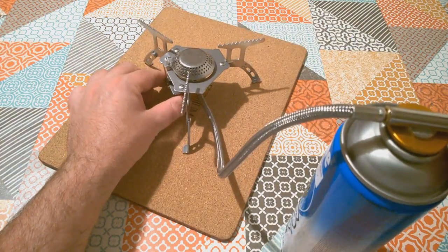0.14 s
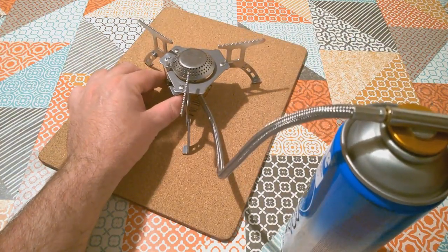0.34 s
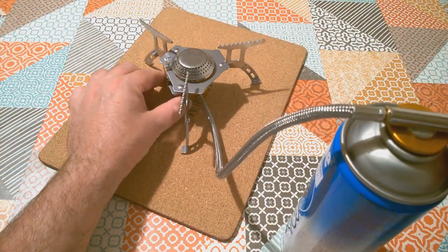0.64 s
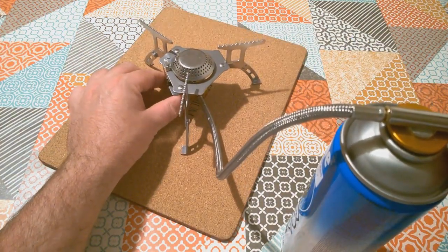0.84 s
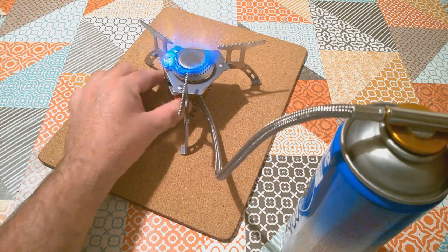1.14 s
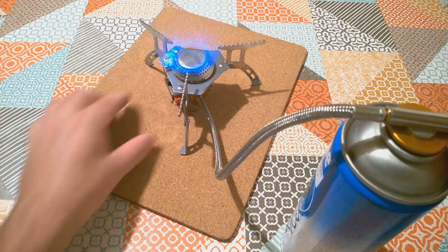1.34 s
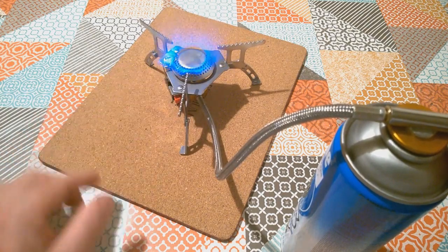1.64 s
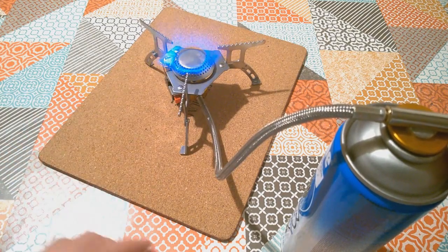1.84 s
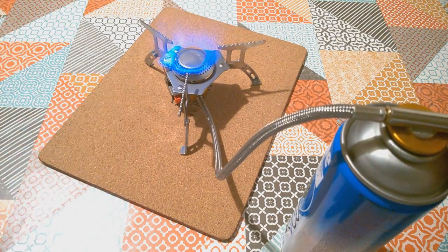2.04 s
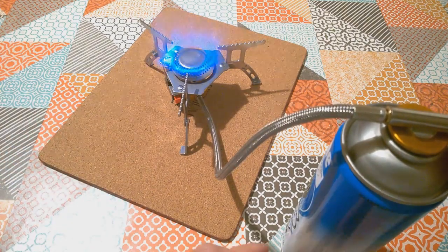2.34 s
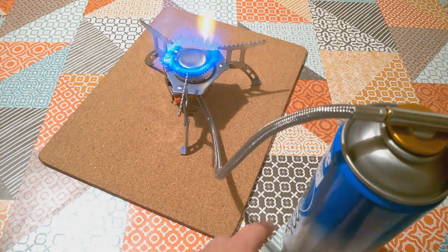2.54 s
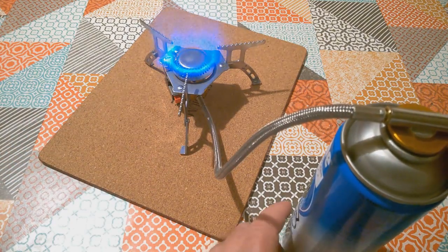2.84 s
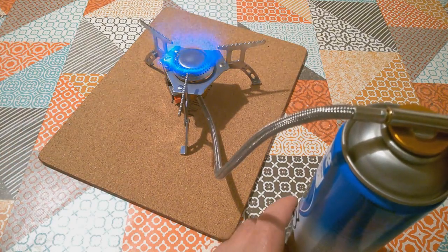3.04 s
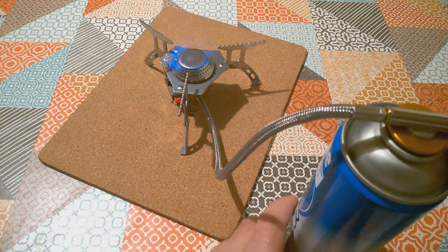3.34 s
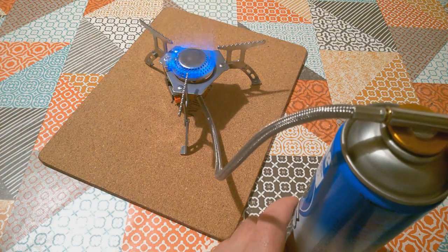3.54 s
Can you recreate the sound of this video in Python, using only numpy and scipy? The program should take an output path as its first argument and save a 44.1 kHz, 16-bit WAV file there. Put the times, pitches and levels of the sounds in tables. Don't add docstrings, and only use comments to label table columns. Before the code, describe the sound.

A small gas stove, close and mono. A sharp igniter snap at 0.14 s, the gas hiss swelling to full, bright and whistly, by 0.27. It dips around 0.7-0.9, with loud metallic snaps at 0.68 and 0.84. The snap at 1.08 lights it: soft whoomp, brief low flare, then steady hiss over low roar. From 3.2 it fades, gone by 3.6; soft bumps, cloth rasp, faint room rumble.

```python
import sys
import numpy as np
from scipy import signal
from scipy.fft import rfft, irfft, next_fast_len
from scipy.io import wavfile
from scipy.ndimage import uniform_filter1d, map_coordinates

SR = 44100
rng = np.random.default_rng(int(sys.argv[2]) if len(sys.argv) > 2 else 0)


def elevation(decibels):
    levels = np.asarray(decibels, float)
    return 10 ** (levels / 20)


def store_wav(level_fs):
    pcm = np.round(np.clip(np.atleast_2d(level_fs), -1, 1) * 32767)
    wavfile.write(sys.argv[1], SR, pcm.T.astype(np.int16))


N = 163170

# [t/s, jet level/dB, coarse turbulence over the jet level/dB]
GAS_FLOW = [(.14, -48, -6), (.17, -32.5, 7), (.21, -19, -13), (.27, -11.5, -5), (.58, -10, -5),
            (.67, -15.5, -2), (.73, -21.5, 1.5), (.82, -22, -4), (.89, -19, -2), (.97, -13, -7),
            (1.25, -10.5, -19), (1.38, -15, 2.5), (1.71, -12.5, -5), (3.19, -11.5, 1.5), (3.35, -15, -1),
            (3.5, -29.5, -3), (3.56, -50, 5), (3.6, -78, -3)]
# [f/Hz, level/dB]
JET_COLOUR = [(300, -32), (700, -21.5), (1500, -18), (3000, -16), (6000, -15), (10500, -16.5),
              (12000, -30.5), (16000, -34.5)]
# [f/Hz, width/Hz, level/dB]
COLD_BURNER = [(2320, 320, 9), (4020, 400, 10), (5240, 380, 11), (6170, 1200, 14), (9000, 1100, 7.5),
               (8900, 400, 19), (9540, 290, 20), (10200, 900, 10.5), (13300, 360, 27)]
# [f/Hz, width/Hz, level/dB]
CATCHING_BURNER = [(4000, 170, -10.5), (5830, 250, 10), (6450, 460, 6.5), (8600, 1500, 2), (9800, 560, 2),
                   (13300, 900, 11)]
# [f/Hz, width/Hz, level/dB]
HOT_BURNER = [(1850, 1140, 3), (3740, 270, 10.5), (4400, 1100, 1), (5347, 510, 12), (6370, 190, 8),
              (6900, 140, 9.5), (9020, 340, 12.5), (9570, 330, 6.5), (10050, 1030, 9.5), (10800, 440, 4.5),
              (13300, 250, 21.5), (13400, 470, 17.5)]
# [f/Hz, width/Hz, depth/1]
HOT_NOTCHES = [(2980, 440, 0.68), (7600, 330, 0.23), (15500, 2100, 0.32)]
# [f/Hz, level/dB]
COARSE_COLOUR = [(300, -28), (600, -20.5), (1200, -4), (2500, -10), (4000, -17.5), (9000, -36)]
# [t/s, delay/ms, level/dB]
HAND_ECHO = [
    (1.12, .18, -16),
    (1.2, .19, -10),
    (1.33, .29, -10),
    (1.5, .7, -25),
]
# [t/s, roar level/dB]
FLAME_SIZE = [
    (1.082, -58),
    (1.095, -13.5),
    (1.13, -24),
    (1.4, -21.5),
    (1.7, -21),
    (3.19, -19),
    (3.36, -21.5),
    (3.5, -35.5),
    (3.62, -50),
]
# [f/Hz, level/dB]
ROAR_COLOUR = [(25, -24), (60, -8), (110, -7.5), (250, -7.5), (420, -14), (800, -17), (950, -30.5),
               (2000, -28)]
# [f/Hz, width/Hz, level/dB]
FLAME_MODES = [(140, 42, 6), (260, 37, 4.5), (336.6, 63, 13), (410, 20, 13.5), (711, 210, 8.5)]
# [t/s, level/dB]
FLARE_LEVEL = [
    (1.09, -42),
    (1.2, -27),
    (1.4, -20.5),
    (1.6, -29),
    (1.8, -63),
]
# [t/s, crack level/dB, table thump level/dB, knock of the feet level/dB]
SNAPS = [
    (.068, -42, -46, -60),
    (.138, -9, -24, -36),
    (.6846, -4, -33, -42),
    (.838, -4, -29, -27),
    (1.0798, -6, -45, -45),
    (3.634, -66, -42, -40),
    (3.684, -60, -36, -24),
]
# [f/Hz, level/dB, t60/s]
FRAME_MODES = [(3300, -6, .03), (5300, -5, .025), (7500, -12, .02), (9900, 0, .03), (11000, -3, .03),
               (13000, -6, .02), (750, -26, .1), (2000, -30, .08)]
# [f/Hz, level/dB, t60/s]
TABLE_MODES = [(70, -9, 0.44), (102.3, -1.5, 0.24), (124, 8, 0.068), (160, -13, 0.12)]
# [f/Hz, level/dB, t60/s]
FEET_MODES = [(230, 10, 0.02), (340, 3.5, 0.072), (420, -1, 0.057)]
# [f/Hz, level/dB]
TAIL_COLOUR = [(400, -25), (2000, -12), (4000, 0), (5500, -12), (8000, -6), (10300, 0), (12500, -8),
               (16000, -16)]
# [t/s, level/dB]
SLIDE_LEVEL = [
    (3.63, -75),
    (3.665, -50),
    (3.7, -40),
]
# [f/Hz, level/dB]
CLOTH_COLOUR = [(300, -20), (900, -20), (2000, -1), (4000, -9), (5600, 6), (8000, -10), (10500, -12),
                (12000, -29)]
# [f/Hz, level/dB]
ROOM_COLOUR = [(25, -25), (60, -8), (110, 0), (170, -9), (400, -13), (800, -30), (3000, -52), (16000, -72)]
# [t/s, gain drop/dB, release/s]
DUCKS = [
    (.6854, 13, .006),
    (1.0804, 14, .025),
]


def jet():
    catch_s, warm_s, warming_s = 1.08, 1.24, .09
    level_db, coarse_db = curves(GAS_FLOW)
    t = np.arange(N) / SR
    lit = t > catch_s
    hot = np.clip((t - warm_s) / warming_s, 0, 1)

    gas = eddies(patchy_db=1.08, spiky_db=1.0, rate=900)
    cold = unit(filtered(gas, lambda f: along(JET_COLOUR, f) * ringing(COLD_BURNER, f)))
    catching = unit(filtered(gas, lambda f: along(JET_COLOUR, f) * ringing(CATCHING_BURNER, f)))
    warm = unit(filtered(gas, lambda f: along(JET_COLOUR, f) * ringing(HOT_BURNER, f) * notches(f)))
    hiss = drift((1 - hot) * np.where(lit, catching, cold) + hot * warm)
    hiss = dulled(hiss, level_db)

    coarse = eddies(patchy_db=0.3, spiky_db=2.0, rate=230)
    coarse = unit(filtered(coarse, lambda f: along(COARSE_COLOUR, f)))
    flutter_db = .4 * wobble(5) + .8 * wobble(45)
    return elevation(level_db + flutter_db) * (hiss + elevation(-16 + coarse_db) * coarse)


def notches(f):
    return np.prod([1 - np.clip(depth, 0, 1) * bump(f, hz, width) for hz, width, depth in HOT_NOTCHES], axis=0)


def drift(x):
    return patchy(x, drift_db=.8, bins=10, frames=60)


def dulled(hiss, level_db):
    top_hz, under_db, slope = 11500, -15, .35
    top = filtered(hiss, lambda f: 1 / (1 + (top_hz / (f + 1)) ** 8))
    return hiss - top * (1 - elevation(slope * np.clip(level_db - under_db, None, 0)))


def hand(x):
    delay_ms, db = curves(HAND_ECHO)
    n = np.arange(N)
    near = n / SR < HAND_ECHO[-1][0]
    echo = map_coordinates(x, [n - np.clip(delay_ms, 0, 5) * SR / 1000])
    return x + elevation(db) * near * echo


def flame():
    size_db, = curves(FLAME_SIZE)
    flare_db, = curves(FLARE_LEVEL)
    roar = eddies(patchy_db=0.0, spiky_db=0.5, rate=51)
    roar = unit(filtered(roar, lambda f: along(ROAR_COLOUR, f) * ringing(FLAME_MODES, f)))
    flare = eddies(patchy_db=0.7, spiky_db=1.0, rate=50)
    flare = unit(filtered(flare, lambda f: bump(f, hz=344, width=103)))
    return elevation(size_db + 0.86 * wobble(6.7)) * roar + elevation(flare_db) * flare


def igniter():
    blow_s, blow_width_s, lead_db = .0018, .0003, -11
    lag_s, rise_s = .008, .004
    out = np.zeros(N + SR)
    t = np.arange(SR // 2) / SR
    late = np.clip(t - lag_s, 0, None)
    air = unit(filtered(rng.standard_normal(N), lambda f: along(TAIL_COLOUR, f)))

    blow = elevation(lead_db) + np.exp(-((t - blow_s) / blow_width_s) ** 2)
    frame = modes(FRAME_MODES, t)
    table = modes(TABLE_MODES, late) * (1 - np.exp(-late / rise_s))
    feet = modes(FEET_MODES, t) * (1 - np.exp(-(t / rise_s) ** 2))
    for s, crack_db, thump_db, knock_db in SNAPS:
        start = round(s * SR)
        here = np.roll(air, -start)[:len(t)]
        crack = blow * (.6 * frame + .4 * elevation(-60 * t / .015) * here)
        tail = elevation(-17 - 60 * t / .13) * here
        low = -elevation(thump_db) * table - elevation(knock_db) * feet
        out[start:][:len(t)] += elevation(crack_db) * (crack + tail) + low
    out[:len(t)] += elevation(-34 - 60 * t / .19) * air[:len(t)]
    return out[:N]


def modes(table, t):
    return sum(elevation(db - 60 * t / t60) * np.sin(2 * np.pi * hz * t) for hz, db, t60 in table)


def shuffle():
    level_db, = curves(SLIDE_LEVEL)
    rasp = unit(filtered(rng.standard_normal(N), lambda f: along(CLOTH_COLOUR, f)))
    return elevation(level_db + 3 * wobble(150)) * rasp


def walls(x):
    first_s, spread_s, echo_db = .004, .03, -17
    when, size = rng.uniform(size=(12, 2)).T
    delay = ((first_s + when * spread_s) * SR).astype(int)
    echoes = np.bincount(delay, (2 * size - 1) * elevation(echo_db))
    return (x + np.convolve(x, echoes)[:N]) / np.sqrt(1 + np.sum(echoes ** 2))


def room():
    air = eddies(patchy_db=1.5, spiky_db=2.5, rate=25)
    return elevation(-49.5) * unit(filtered(air, lambda f: along(ROOM_COLOUR, f)))


def eddies(patchy_db, spiky_db, rate):
    x = patchy(rng.standard_normal(N + 512), patchy_db, bins=8, frames=10)
    return x * elevation(spiky_db * wobble(rate))


def patchy(x, drift_db, bins, frames):
    z = signal.stft(x, nperseg=512)[2]
    field = uniform_filter1d(rng.standard_normal(z.shape), size=bins, axis=0)
    field = uniform_filter1d(field, size=frames, axis=1)
    return signal.istft(z * elevation(drift_db * unit(field)), nperseg=512)[1][:N]


def wobble(rate):
    knots = rng.standard_normal(int(N * rate / SR) + 4)
    return map_coordinates(knots, [np.arange(N) * rate / SR])


def curves(rows):
    s, *cols = np.transpose(rows)
    return [np.interp(np.arange(N) / SR, s, c, left=-120) for c in cols]


def unit(x):
    return x / np.sqrt(np.mean(x ** 2) + 1e-20)


def filtered(x, response):
    m = next_fast_len(N + SR // 2)
    return irfft(rfft(x, m) * response(np.fft.rfftfreq(m, 1 / SR)), m)[..., :N]


def along(points, hz):
    f, db = np.transpose(points)
    return elevation(np.interp(np.log(hz + 1), np.log(f + 1), db))


def bump(f, hz, width):
    return 1 / (1 + (2 * (f - hz) / width) ** 2)


def ringing(peaks, f):
    return np.sqrt(1 + sum(elevation(db) ** 2 * bump(f, hz, width) for hz, width, db in peaks))


def limiter():
    ahead_s = 0.0062
    t = np.arange(N) / SR
    drop_db = sum(over * (t > s - ahead_s) * np.exp(-np.clip(t - s, 0, None) / release)
                  for s, over, release in DUCKS)
    return elevation(-drop_db)


def scene():
    steady = walls(hand(jet()) + flame()) + room()
    gain = uniform_filter1d(limiter(), size=40)
    mono = steady * gain + igniter() + shuffle()
    return np.array([mono, mono])


def band_limit(x):
    return signal.sosfilt(signal.butter(12, 16320, fs=SR, output="sos"), x)


def record(dry):
    ceiling, top_hz = 0.91, 15800
    soft = dry / (1 + np.abs(dry / ceiling) ** 4) ** (1 / 4)
    mix = filtered(soft, lambda f: f < top_hz)
    return band_limit(mix)


dry = scene()
out = record(dry)
store_wav(out)
```